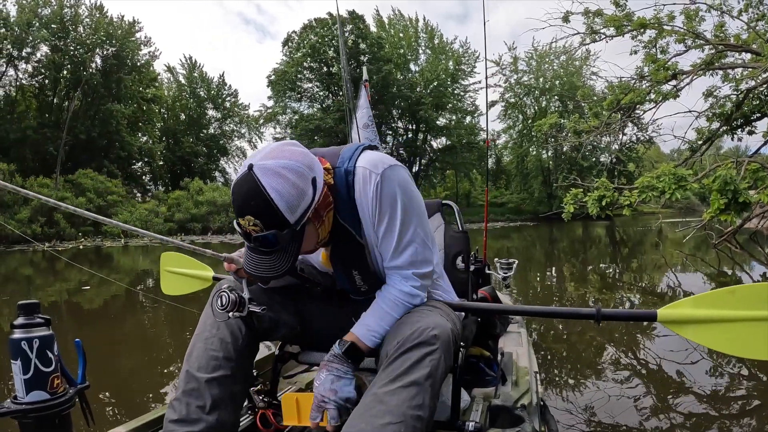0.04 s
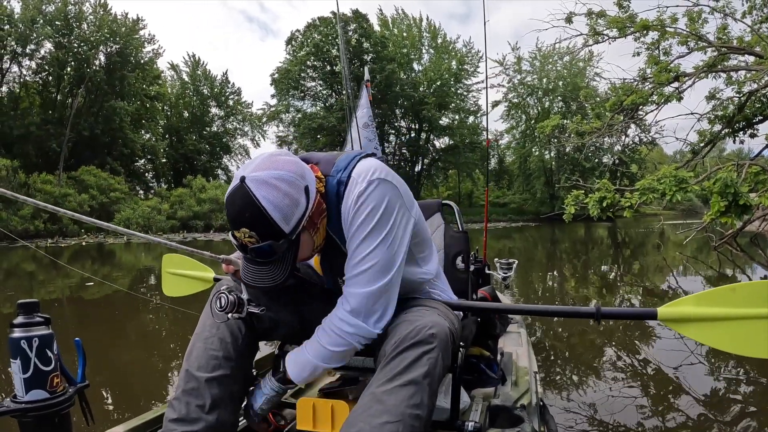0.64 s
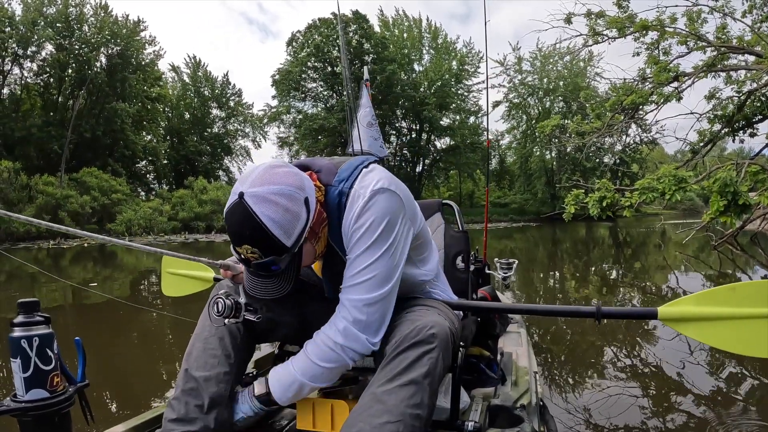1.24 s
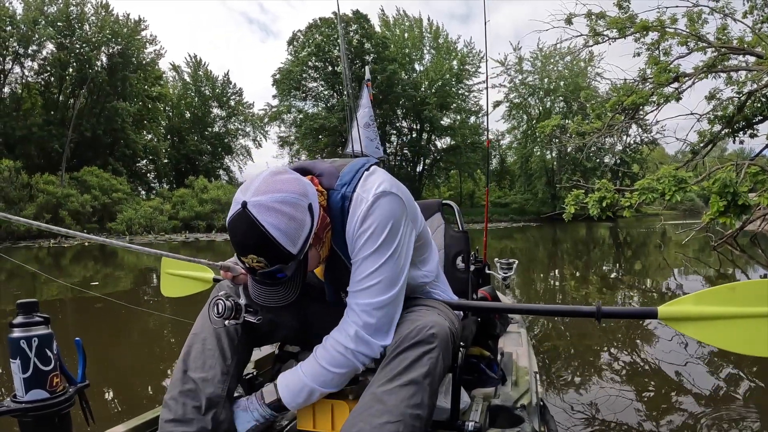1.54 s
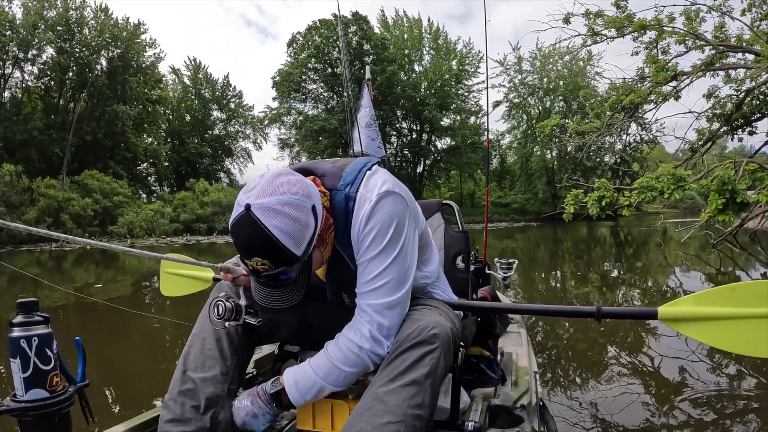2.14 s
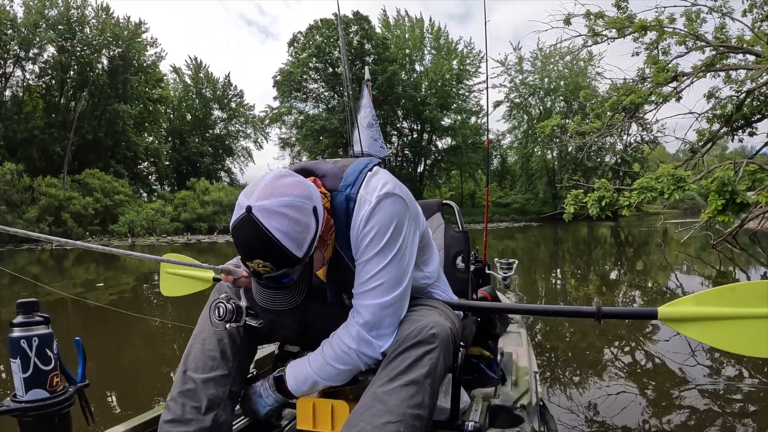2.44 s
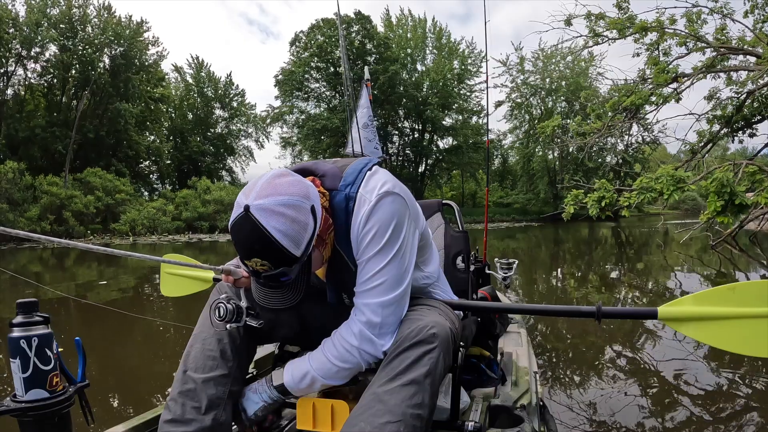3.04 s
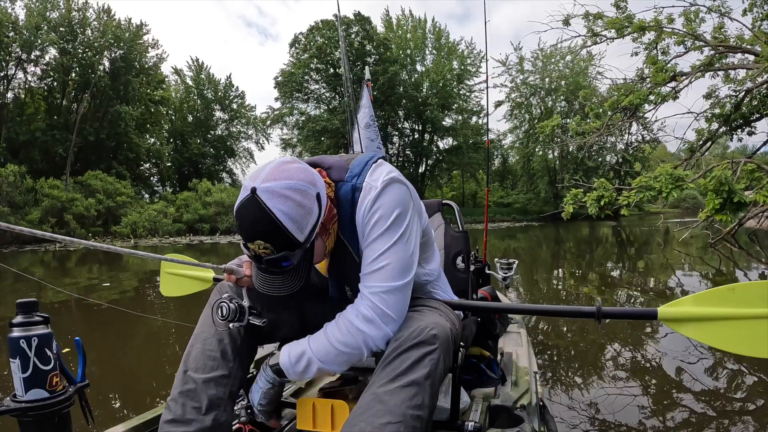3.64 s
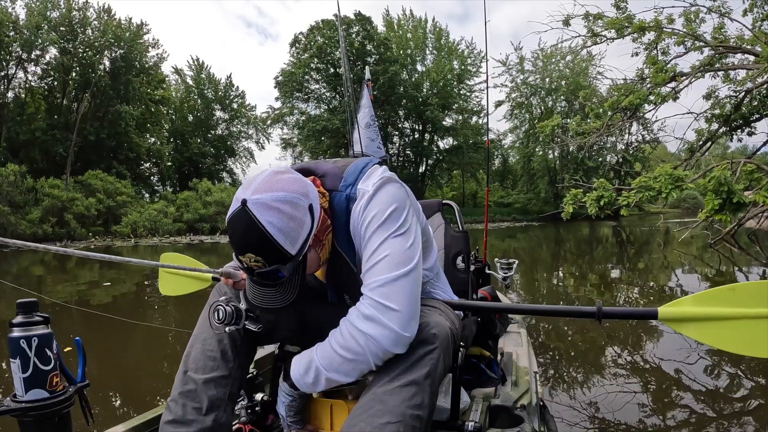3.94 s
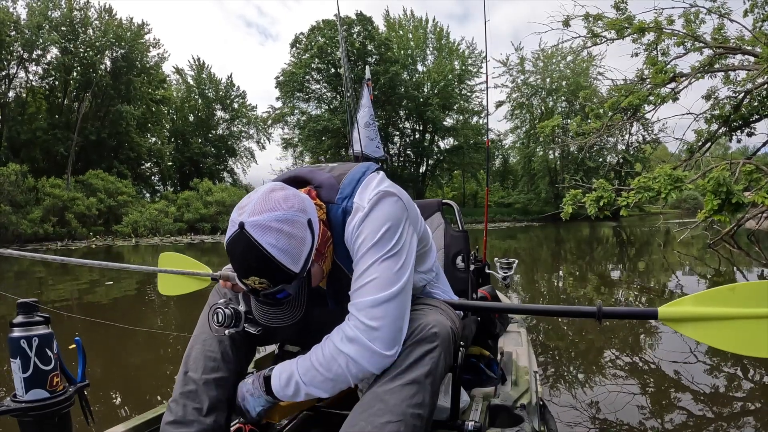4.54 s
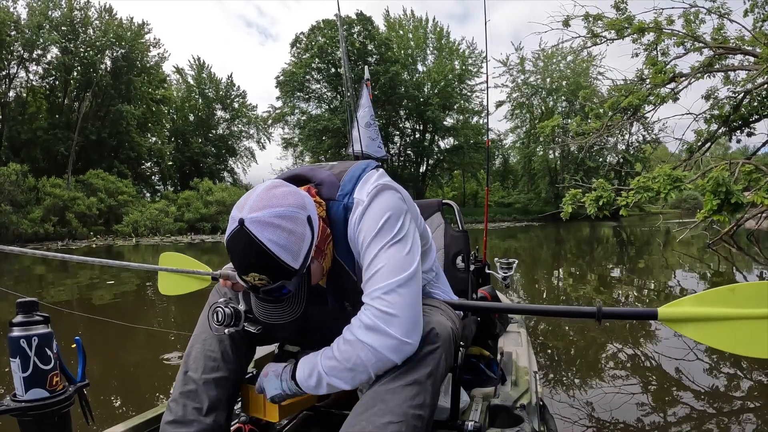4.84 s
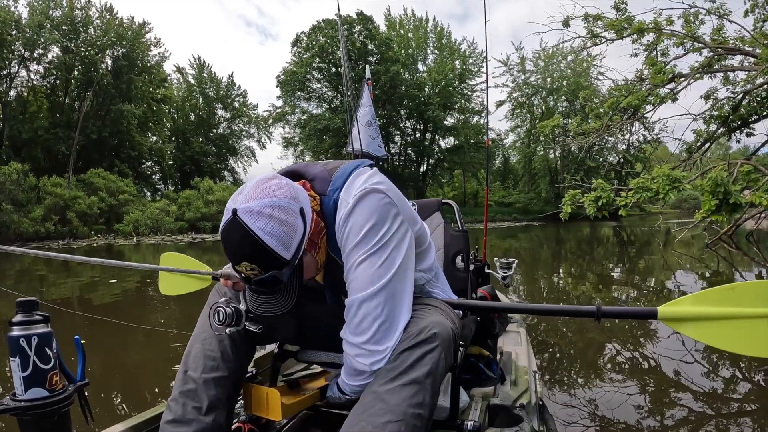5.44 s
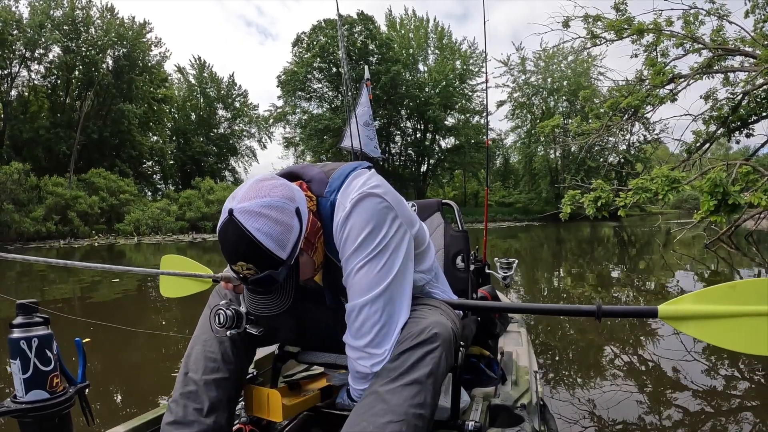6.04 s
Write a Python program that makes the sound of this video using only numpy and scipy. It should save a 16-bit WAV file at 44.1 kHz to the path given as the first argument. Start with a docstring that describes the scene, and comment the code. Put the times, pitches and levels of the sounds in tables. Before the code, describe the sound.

Low wind rumbles on the microphone throughout, over a soft murmur from a plastic kayak hull, a faint hiss of leaves and a distant traffic hum. From the start, sleeves rustle and fishing gear scrapes and knocks close by on the hollow hull, with a strong knock near 0.5 seconds. More bumps and scrapes come around 1 second, along with three very faint bird chirps. A quieter stretch holds only light clicks and cloth rubbing. At about 2.5 seconds metal tackle jingles briefly with a sharp click, followed by dull knocks until 3.4 seconds and one more faint chirp. Sleeves rustle again around 4 seconds, and the busiest, sharpest clatter comes near 4.4 seconds, just ahead of a small gust. Further knocks fall around 5 seconds, and the last two just before 6 seconds.

```python
"""Fishing gear is shifted about in a plastic kayak on a calm river. From the start, wind rumbles on the
microphone and stirs the leaves, the hull murmurs, far traffic hums and sleeves rub as the angler reaches.
Gear scrapes and knocks on the hollow hull, making it ring, and near 1 s a small bird calls from the bank.
Light pieces click together, and at 2.5 s metal tackle jingles. More knocks follow, with one faint bird
call among them; the busiest clatter comes near 4.4 s, and the last knocks fall just before 6 s."""
import sys
import numpy as np
from scipy import signal
from scipy.io import wavfile

SR = 44100
rng = np.random.default_rng(int(sys.argv[2]) if len(sys.argv) > 2 else 0)


def master_out(mix):
    """Clip the mix to full scale and print it as 16-bit PCM to the path in sys.argv[1]."""
    frames = np.transpose(np.atleast_2d(mix))
    ceiling = np.clip(frames, -1, 1)
    pcm = np.round(ceiling * 32767).astype(np.int16)
    wavfile.write(sys.argv[1], SR, pcm)


N = 276948

RING_SAMPLES = 14000
EDGES = 20 * 2 ** np.arange(0, 10, .5)   # half-octave bands [Hz]
CENTRES = np.sqrt(EDGES[1:] * EDGES[:-1])
BANDS = [signal.butter(2, pair, "band", fs=SR, output="sos") for pair in zip(EDGES, EDGES[1:])]
SIDES = np.array([[1], [-1]])   # left, right


def from_db(db):
    """Turn decibels into a number to multiply by."""
    return 10 ** (np.asarray(db) / 20)


def rms_one(x):
    """Scale a sound to an average power of 1."""
    return x / np.sqrt(np.mean(x ** 2) + 1e-20)


def energy_one(x):
    """Scale each channel to a total energy of 1."""
    return x / np.sqrt(np.sum(x ** 2, axis=-1, keepdims=True) + 1e-20)


def in_time(rows):
    """Join (time, level) points into a level for every sample."""
    return np.interp(np.arange(N) / SR, *np.transpose(rows))


def at_hz(points, hz):
    """Read a table at any frequency, sliding between its rows."""
    row_hz, *columns = np.transpose(points)
    return np.squeeze([np.interp(np.log(hz), np.log(row_hz), c) for c in columns])


def add(track, s, sound):
    """Mix a sound in, starting at s seconds."""
    i = max(round(s * SR), 0)
    track[:, i:i + sound.shape[-1]] += sound[..., :N - i]


def drift(rate_hz):
    """A smooth random wobble, about 1 in size."""
    pole = np.exp(-80 * np.pi * rate_hz / SR)
    steps = rng.standard_normal(N // 40 + 2002)   # one every 40 samples
    slow = signal.lfilter([1], [1, -2 * pole, pole * pole], steps)[2000:]
    return np.interp(np.arange(N) / 40, np.arange(len(slow)), rms_one(slow))


# how much louder nearby things are on the left: (frequency [Hz], left over right [dB])
LEFT_LEAN = [(40, -1.8), (100, -1), (500, -1), (2000, 1), (5000, 1.2), (8000, 3), (12000, 7.5)]
def lean_db(hz):
    """Turn the left side up and the right down by the same amount, or the other way round."""
    return at_hz(LEFT_LEAN, hz) * SIDES / 2


# how alike the surroundings sound on both sides: (frequency [Hz], likeness [0-1])
STEREO_LIKENESS = [(30, .965), (250, .95), (500, .86), (1000, .87), (3000, .88), (6000, .87), (9000, .62),
                   (13000, .25)]
def noise(spectrum, flutter_db, lean):
    """Stereo noise of power 1, in bands that each flutter on their own, the lowest slowly."""
    out, white = 0, rng.standard_normal((2, 2, N))
    for k, hz in enumerate(CENTRES):
        if spectrum[0][0] <= hz <= spectrum[-1][0]:
            mid, side = signal.sosfilt(BANDS[k], white[k % 2])
            alike = np.clip(at_hz(STEREO_LIKENESS, hz), 0, 1)
            wobble_db = flutter_db * drift(min(14, hz / 10))
            gain = from_db(at_hz(spectrum, hz) + wobble_db + lean * lean_db(hz))
            out = out + gain * (np.sqrt(1 + alike) * mid + np.sqrt(1 - alike) * side * SIDES)
    return rms_one(out)


# the wind's deep tone: (frequency [Hz], relative level [dB])
WIND_TONE = [(11, -37), (18, 0), (38, -1), (54, 8.5), (75, -4.5), (103, 0.5), (161, -20), (203, -16),
             (260, -26.5), (340, -45), (570, -120)]
# its gusts: (time [s], relative level [dB])
WIND_GUSTS = [(0.0, -31), (0.17, -24.5), (0.4, -32.5), (0.65, -31.5), (0.82, -37), (1.7, -36.5), (2.1, -37),
              (2.45, -34), (3.0, -33), (3.65, -37), (3.97, -29), (4.3, -35.5), (4.55, -25), (4.8, -34),
              (5.35, -32.5), (5.58, -39.5), (5.94, -27), (6.28, -36.5)]
def wind():
    """Gusts of wind buffet the microphone."""
    return from_db(in_time(WIND_GUSTS) + 3) * noise(WIND_TONE, flutter_db=2, lean=0.27)


# the leaves' hiss: (frequency [Hz], relative level [dB])
LEAF_TONE = [(1500, 3.5), (2500, 8), (3500, 0), (5000, -3.5), (8000, -26), (14000, -44)]
def leaves():
    """Leaves hiss softly in the wind."""
    return from_db(-54) * noise(LEAF_TONE, flutter_db=4, lean=0.5)


# the hull's murmur: (frequency [Hz], relative level [dB])
MURMUR_TONE = [(90, -17.5), (140, -4), (250, -11), (450, -13), (800, -22.5), (1500, -50)]
# its rise and fall: (time [s], relative level [dB])
MURMUR_SWELLS = [(0.0, -33), (0.73, -51), (0.87, -28.5), (1.03, -42), (1.36, -44), (2.04, -45), (3.39, -41),
                 (3.58, -44.5), (4.41, -35), (4.72, -41.5), (5.98, -34), (6.28, -35)]
def hull_murmur():
    """A low murmur from the hull comes and goes."""
    return from_db(in_time(MURMUR_SWELLS) - 0.5) * noise(MURMUR_TONE, flutter_db=2.5, lean=0.32)


# the road's hum: (frequency [Hz], relative level [dB])
TRAFFIC_TONE = [(200, -11), (450, -5), (750, 1.5), (1100, 5), (1500, -1), (2100, -12.5), (3200, -51),
                (5000, -32)]
# its slow swell: (time [s], relative level [dB])
TRAFFIC_SWELL = [(0.0, -41), (0.58, -42.5), (2.8, -39), (4.11, -39), (5.72, -35.5), (5.84, -33.5),
                 (6.28, -35)]
def traffic():
    """A road hums far beyond the trees."""
    return from_db(in_time(TRAFFIC_SWELL) + 1) * noise(TRAFFIC_TONE, flutter_db=0.6, lean=0.1)


# the hiss of cloth: (frequency [Hz], relative level [dB])
CLOTH_TONE = [(600, 16), (1800, 18), (3000, 13), (5000, 9.5), (7000, 8.5), (8500, 1), (12500, -1.5),
              (14500, -20)]
# arm movements: (start [s], length [s], rustle level [dB])
ARM_REACHES = [(-0.3, 0.42, -34.5), (0.098, 0.2, -37), (0.394, 0.08, -40), (0.533, 0.084, -40.5),
               (0.717, 0.22, -48), (1.294, 0.073, -44), (1.467, 0.16, -52), (1.9, 0.093, -56.5),
               (2.186, 0.15, -50), (2.5, 0.17, -59), (3.6, 0.12, -53), (3.745, 0.038, -41.5),
               (3.822, 0.038, -44), (4.025, 0.087, -44), (4.1, 0.18, -43.5), (4.847, 0.14, -46.5),
               (5.295, 0.51, -46), (5.84, 0.24, -55)]
def sleeves(rest_db=-62, swell_share=0.72, release_s=0.079, snaps_per_s=45):
    """Cloth rubs on cloth at every reach: a hiss with the small snaps of catching threads."""
    t, power = np.arange(N) / SR, from_db(rest_db) ** 2
    for s, length_s, rustle_db in ARM_REACHES:
        swell = np.clip((t - s) / (swell_share * length_s), 0, 1)
        release = np.exp(-np.maximum(t - s - length_s, 0) / release_s)   # once the arm stops
        power = power + (from_db(rustle_db) * swell * release) ** 2
    catches = (rng.random(N) < snaps_per_s / SR) * np.minimum(rng.exponential(1, N), 3)
    snaps = signal.lfilter([1], [1, -np.exp(-1 / (0.00061 * SR))], catches)
    roughness = from_db(2 * drift(150)) * (1 + 0.34 * snaps)
    return np.sqrt(power) * roughness * noise(CLOTH_TONE, flutter_db=2, lean=0.48)


# the hull's clear notes: (pitch [Hz], relative level [dB], time to fade 60 dB at damping 1 [s])
HULL_NOTES = [(82, -2, .1), (114, 0, .14), (150, 1, .15), (244, -2, .2), (409, -7, .12), (455, -3, .15),
              (679, -8, .1), (856, -9, .1), (990, -5, .1), (1255, -5, .09), (1720, -2, .06), (1795, 1, .08),
              (2215, -3, .06), (2500, -7, .05), (2724, -3, .035), (3055, -6, .05), (3453, -7, .055),
              (3758, -8, .055), (4598, -8, .045), (5067, -7, .045), (5487, -7, .035), (5665, -9, .03),
              (6065, -2, .035), (6535, -8, .025), (7072, -7, .035)]
# the blur of weaker notes between them, by half octave: same columns
HULL_BLUR = [(70, 3, 0.21), (155, 11.5, 0.41), (450, -9.5, 0.24), (1100, 9.5, 0.11), (1880, 5, 0.058),
             (4100, -3.5, 0.02), (5960, 3, 0.044), (8640, -16.5, 0.037), (12500, -25, 0.025)]
def hull_ring(damping, notes_db, crack_db, tail_db, sparkle_db):
    """One touch makes the hull crack and ring; more damping makes the ring die sooner."""
    t = np.arange(RING_SAMPLES) / SR
    out = np.zeros((2, RING_SAMPLES))
    travel_s, rise_s, tail_s = 0.001, 0.00012, 0.26
    tail = from_db(tail_db - 60 * t / tail_s)
    for hz, band in zip(CENTRES, BANDS):
        level_db, fade_s = at_hz(HULL_BLUR, hz)
        age = np.maximum(t - travel_s * np.sqrt(500 / max(hz, 100)), 0)   # lows cross the hull slower
        shape = (1 - np.exp(-age / rise_s)) * (from_db(-60 * age * damping / fade_s) + tail)
        burst = energy_one(rng.standard_normal((2, RING_SAMPLES)) * shape)
        burst[0, np.argmax(age > 0)] += from_db(crack_db)
        mid, side = energy_one(signal.sosfilt(band, burst))
        gain = from_db(level_db + sparkle_db * (hz > 8000) + lean_db(hz))
        out += gain * (mid + from_db(-15) * side * SIDES)
    for k, (hz, level_db, fade_s) in enumerate(HULL_NOTES):
        age = np.maximum(t - travel_s * np.sqrt(500 / hz), 0)
        detuned_hz = hz * (1 + rng.normal(0, .005))   # resting gear shifts the pitch a little
        note = np.sin(2 * np.pi * detuned_hz * age) * from_db(-60 * age * damping / fade_s)
        gain = from_db(notes_db + level_db + rng.normal(0, 3.6) + lean_db(hz))
        out += (-1) ** k * gain * energy_one(note)
    return out


# six pitch ranges, named boom, thud, hollow, knock, clack and tick: (bottom [Hz], top [Hz])
PITCH_RANGES = [(50, 105), (105, 280), (280, 700), (700, 2000), (2000, 4500), (4500, 14000)]
RANGE_HZ = np.sqrt(np.prod(PITCH_RANGES, axis=1))
RANGE_FILTERS = [signal.butter(3, pair, "band", fs=SR, output="sos") for pair in PITCH_RANGES]
def shape_tone(sound, levels_db, length_s, treble_cut):
    """Give each of the top ranges the energy of its level held for length_s, less in the treble."""
    out, count = 0, len(levels_db)
    for (low_hz, _), band, level_db in zip(PITCH_RANGES[-count:], RANGE_FILTERS[-count:], levels_db):
        part = signal.sosfilt(band, sound)
        held_s = length_s * (700 / low_hz) ** treble_cut
        out = out + from_db(level_db) * rms_one(part) * np.sqrt(held_s * SR / part.shape[-1])
    return out


def softness_db(hardness_hz, steepness=4.36):
    """A soft touch sounds dull: the ranges above hardness_hz fall away."""
    return -10 * np.log10(1 + (RANGE_HZ / hardness_hz) ** steepness)


# gear dragged over the deck: (start [s], length [s], strength [dB], hardness [Hz])
DECK_SCRAPES = [(0.01, 0.088, -31, 3440), (0.827, 0.043, -27.5, 1850), (1.147, 0.051, -32.5, 3340),
                (1.337, 0.046, -47.5, 12000), (2.496, 0.043, -35.5, 3300), (3.173, 0.025, -30, 350)]
def scrapes(slips_per_s=2000):
    """A dragged piece sticks and slips, harder towards the end of its slide."""
    out = np.zeros((2, N))
    for s, length_s, strength_db, hardness_hz in DECK_SCRAPES:
        push = np.linspace(.4, 1, round(length_s * SR))
        slips = (rng.random(len(push)) < slips_per_s / SR) * rng.standard_normal(len(push)) * push
        ring = hull_ring(damping=7.6, notes_db=-6.5, crack_db=-5.5, tail_db=-36, sparkle_db=13.5)
        grating = signal.fftconvolve(ring, slips[None], axes=1)   # every slip rings the hull
        levels_db = strength_db + softness_db(hardness_hz)[2:]   # no boom or thud
        add(out, s, shape_tone(grating, levels_db, length_s, treble_cut=0))
    return out


# a perfectly hard blow in each range, boom to tick: (relative level [dB])
HARD_BLOW_DB = [2.5, 4, -2, -0.5, -2, -3.5]
def blow_db(strength_db, hardness_hz, weight_db, hollow_db, boom_from_db=-16):
    """A blow's level in each range: hard pieces are bright, heavy ones deep, and only strong blows boom."""
    boom_db = 4.2 * min(strength_db - boom_from_db, 0)
    lows_db = [weight_db + boom_db, weight_db, 0.36 * weight_db + hollow_db, 0, 0, 0]
    return strength_db + softness_db(hardness_hz) + HARD_BLOW_DB + lows_db


# gear hitting the hull: (time [s], strength [dB], hardness [Hz], weight [dB], hollowness of the spot [dB])
HULL_KNOCKS = [(0.016, -26, 5500, -2.5, -18), (0.044, -28, 6000, 6, -4), (0.059, -24.5, 8000, -14, 0),
               (0.202, -21.5, 2170, -11, -7), (0.233, -21.5, 410, -1.5, 2), (0.275, -30, 1500, 1, -1),
               (0.462, -13, 2340, 0.5, -2), (0.495, -20.5, 570, -8, -0.5), (0.894, -22.5, 2800, -6.5, 2),
               (0.959, -24.5, 1400, 4.5, 3.5), (1.084, -20, 350, -7, 3.5), (1.155, -22, 990, -4, 5.5),
               (1.192, -33, 8900, 8, 7.5), (2.695, -24, 6500, -1, 0), (2.787, -21, 400, 9, 6.5),
               (3.192, -17, 300, -2.5, 2.5), (3.272, -22, 2770, -11, 5.5), (3.379, -27, 1500, 6.5, 3.5),
               (4.342, -14, 8250, -6, -7.5), (4.386, -15, 2000, 3.5, -1.5), (4.396, -15.5, 3450, 0.5, -0.5),
               (4.402, -22, 5570, 4.5, 4.5), (4.439, -20, 2110, 6.5, 1), (4.675, -31.5, 1100, -4, 0),
               (4.973, -20, 2580, 0, 0.5), (4.986, -30, 5530, 9.5, 5.5), (5.091, -25.5, 700, -13, 7.5),
               (5.648, -16, 746, -13, 1.5), (5.754, -19, 800, -12, 6)]
def knocks(flex_hz=105.5, flex_fade_s=0.023):
    """The deck bends under a blow and springs back in a cycle or two, while the hull rings on."""
    out, t = np.zeros((2, N)), np.arange(RING_SAMPLES) / SR
    swing = np.sin(2 * np.pi * flex_hz * t) * from_db(-60 * t / flex_fade_s)
    flex = from_db(13.5) * energy_one(swing)
    for s, *blow in HULL_KNOCKS:
        ring = hull_ring(damping=1.2, notes_db=0.5, crack_db=-8.5, tail_db=-22.5, sparkle_db=8.5)
        add(out, s, shape_tone(ring + flex, blow_db(*blow), length_s=0.0084, treble_cut=0.2))
    return out


# bird calls: (start [s], length [s], pitch before scaling [Hz], level [dB])
BIRD_CALLS = [(0.785, .045, 5000, -60), (0.92, .04, 5750, -60), (1.045, .035, 5600, -56),
              (2.92, .07, 5000, -66)]
def bird():
    """Thin whistles rise and fall, made unsteady by the trip through the leaves."""
    out = np.zeros((2, N))
    for s, length_s, scale_hz, level_db in BIRD_CALLS:
        arch = np.sin(np.linspace(0, np.pi, round(length_s * SR)))
        pitch_hz = scale_hz * (0.77 + 0.058 * arch + .012 * drift(390)[:len(arch)])
        add(out, s, from_db(level_db) * arch * np.sin(2 * np.pi * np.cumsum(pitch_hz) / SR))
    return out


# a tap in each range, hollow to tick: (relative level [dB])
TAP_TONE_DB = [-16.5, -6.5, 1, -6]
# light pieces tapping each other: (time [s], pitch [Hz], strength [dB], brightness [dB per octave])
GEAR_CLICKS = [(1.468, 4800, -46.5, 0), (1.669, 4650, -37.5, 4), (1.826, 4740, -42, -2.5),
               (2.486, 3280, -42, 2), (2.5282, 6100, -45, -2), (2.5906, 1980, -20.5, -3.5),
               (2.628, 2000, -41, -4), (2.743, 2700, -37.5, -2.5), (3.383, 7200, -48, 0.5),
               (3.452, 7300, -49, 3), (4.1691, 9800, -45.5, 13.5), (5.037, 5900, -42.5, 2.5)]
def clicks(ping_gain=1.5):
    """Light pieces give a short, hard tap that pings at a pitch of their own."""
    out = np.zeros((2, N))
    octaves = np.log2(RANGE_HZ[2:] / RANGE_HZ[-2])   # above the clack range
    for s, ping_hz, strength_db, brightness_db in GEAR_CLICKS:
        ring = hull_ring(damping=4.1, notes_db=-7.5, crack_db=-11, tail_db=-26, sparkle_db=5.5)
        ping = signal.lfilter(*signal.iirpeak(ping_hz, Q=8, fs=SR), ring)
        levels_db = strength_db + brightness_db * octaves + TAP_TONE_DB
        add(out, s, shape_tone(ring + ping_gain * ping, levels_db, length_s=0.0066, treble_cut=0.093))
    return out


# the metal tackle's ring: (pitch [Hz], relative level [dB], time to fade 60 dB [s])
TACKLE_NOTES = [(5950, -1, .04), (6150, 0, .05), (7100, -1, .06), (7400, -5, .04), (11900, -10, .04),
                (12170, -6, .07), (12560, -11, .05)]
# moments when the bits touch: (time [s], strength [dB])
TACKLE_TOUCHES = [(2.503, -46), (2.518, -42), (2.532, -41), (2.592, -46), (2.698, -48), (2.725, -51)]
def jingles(chatter_s=0.0038):
    """Bits of metal tackle chatter for a moment when they touch, and ring thinly."""
    out, t = np.zeros((2, N)), np.arange(RING_SAMPLES) / SR
    ring = sum(np.sin(2 * np.pi * hz * t) * from_db(level_db - 60 * t / fade_s + lean_db(hz))
               for hz, level_db, fade_s in TACKLE_NOTES)
    for s, touch_db in TACKLE_TOUCHES:
        chatter = energy_one(rng.standard_normal(RING_SAMPLES) ** 3 * np.exp(-t / chatter_s))
        add(out, s, from_db(touch_db) * signal.fftconvolve(ring, chatter[None], axes=1))
    return out


def scene():
    """Everything in and around the kayak, added together."""
    gear = knocks() + clicks() + scrapes() + jingles()
    return gear + sleeves() + wind() + hull_murmur() + traffic() + leaves() + bird()


def record(dry):
    """Round off the loudest peaks and cut the highest treble."""
    rounded = dry / (1 + dry ** 6) ** (1 / 6)
    cutoff_hz = 14150
    return signal.sosfilt(signal.ellip(10, .1, 80, cutoff_hz, fs=SR, output="sos"), rounded)


dry = scene()
out = record(dry)
master_out(out)
```